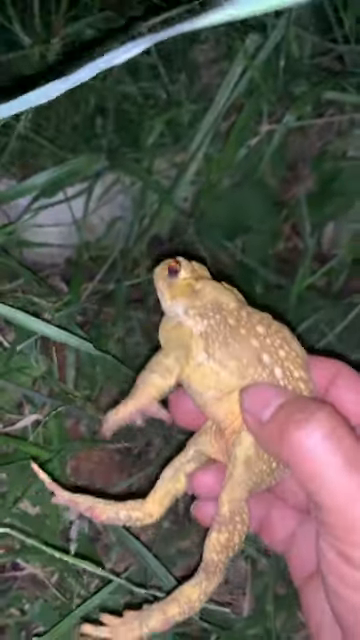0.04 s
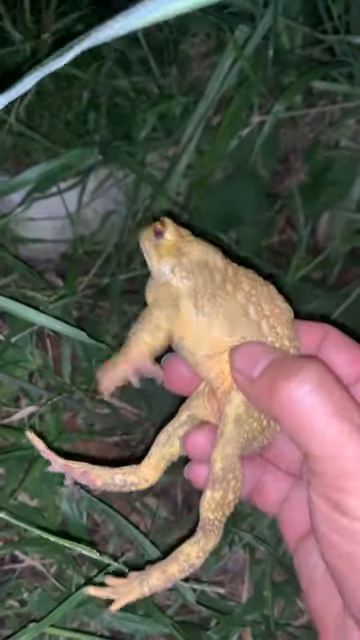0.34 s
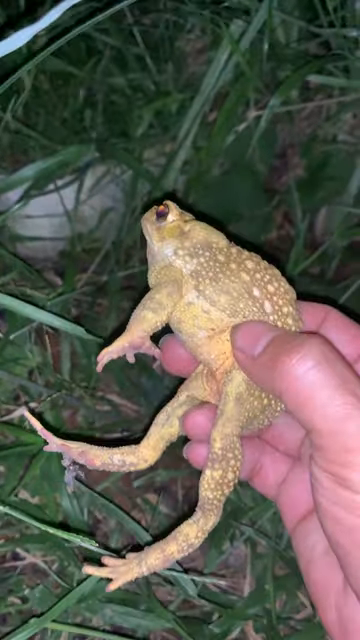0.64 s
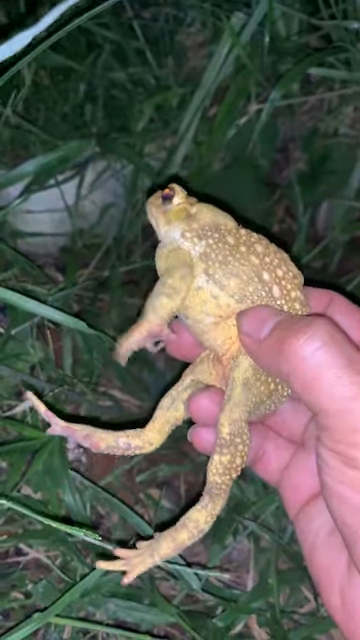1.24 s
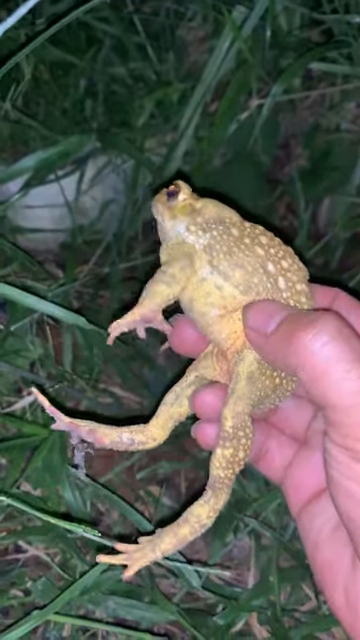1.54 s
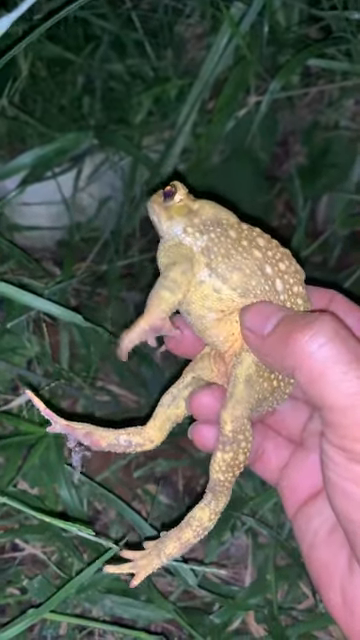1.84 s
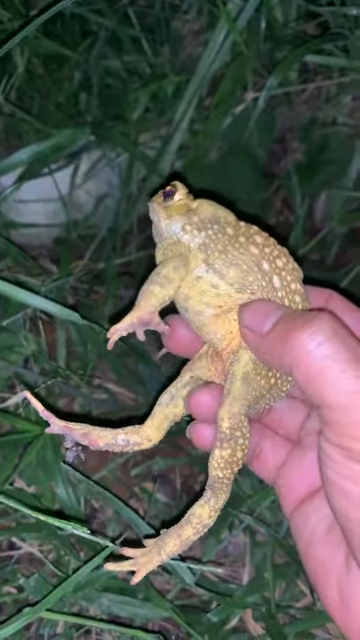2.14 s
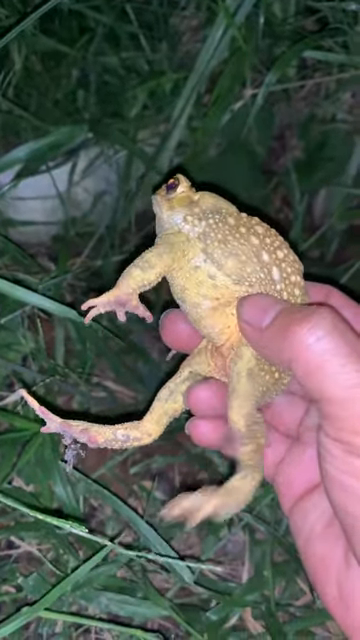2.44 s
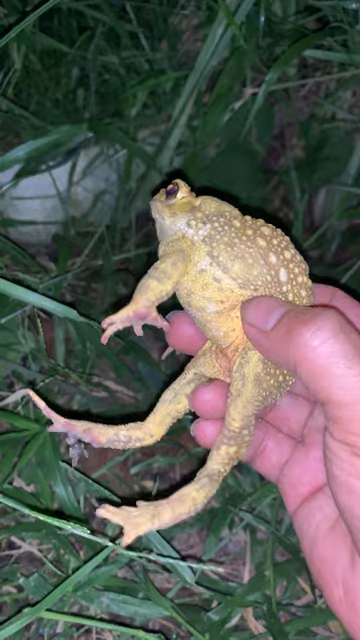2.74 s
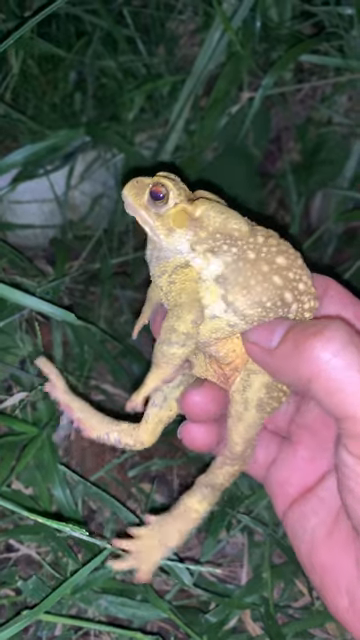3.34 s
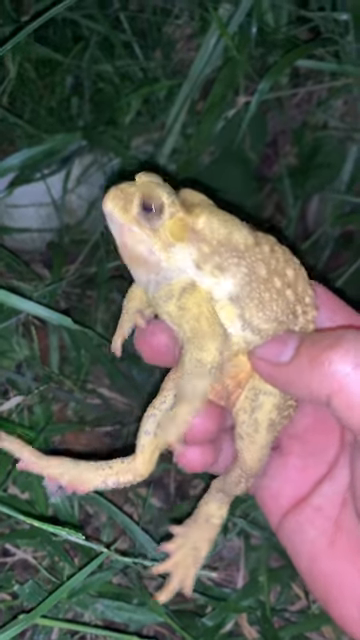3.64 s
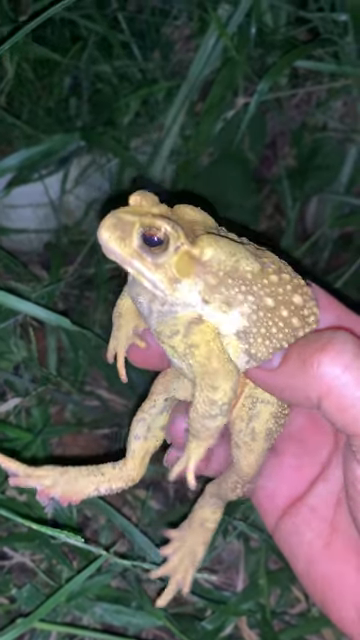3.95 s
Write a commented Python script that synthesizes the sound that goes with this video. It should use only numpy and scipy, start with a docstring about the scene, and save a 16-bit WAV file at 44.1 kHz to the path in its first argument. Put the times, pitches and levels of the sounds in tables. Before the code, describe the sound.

A toad gives short, squeaky, falling chirps close by. Three raspy ones come in the first half second, then about seven from 0.9 to 2 seconds, the strongest near 1.6. After a pause it squeaks at 3.3 seconds, then louder at 3.6 and 3.8, starting another call at the end. Softer crickets trill and chirp throughout over a faint distant rumble, one trill briefly pausing around 0.7 seconds.

```python
"""A hand-held toad gives release calls close to a stereo microphone, on a lawn at night.
Its vibrating vocal cords make short falling squeaks, often led by four quick pulses of the larynx.
Crickets sing by stridulation, sweeping a scraper over a file: a tree cricket trills and two others chirp.
Ground and plants scatter the sound, and more insects sing far off over a low rumble and faint hums."""
import sys
import numpy as np
from scipy import signal
from scipy.fft import rfft, irfft
from scipy.io import wavfile
from scipy.ndimage import uniform_filter1d

SR = 44100
rng = np.random.default_rng(int(sys.argv[2]) if len(sys.argv) > 2 else 0)


def wav_record(signal):
    """Record a signal, one row per channel, as 16-bit PCM in the file named by sys.argv[1]."""
    frames = np.transpose(np.atleast_2d(signal))
    bounded = np.clip(frames, -1, 1)
    # unit amplitude maps onto the largest positive 16-bit level
    quanta = np.round(bounded * 32767).astype(np.int16)
    wavfile.write(sys.argv[1], SR, quanta)


N = 176400

# Lone squeaks: (start [s], fade time [s], level [dB], pitch [Hz], rise [s], overtone gain [dB], sag [ratio])
SQUEAKS = [(0.9465, 0.015, -21.5, 1017, 0.0018, 0, .11), (1.638, .021, -10.5, 990, 0.026, 1, 0.052),
           (3.2525, .012, -17, 1084, 0.0017, 0, 0.2), (3.645, 0.013, -9.5, 1074, 0.0019, -0.5, 0.14),
           (3.8485, 0.023, -8, 1056, 0.0013, -2, 0.15)]
# Pulsed calls: (first peak [s], pulse spacing [s], level [dB], squeak fade time [s])
PULSED_CALLS = [(0.113, 0.0064, -15.5, 0.018), (0.237, 0.007, -14, 0.015), (0.3652, 0.0073, -14.5, 0.015),
                (1.06, 0.0066, -15, 0.019), (1.1801, 0.0058, -15.5, 0.016), (1.3562, 0.0061, -15.5, 0.018),
                (1.7744, .0062, -14, 0.02), (1.914, 0.0073, -14, 0.015), (3.9982, 0.015, -10.5, 0.013)]
# The four pulses of a call: (relative level [dB])
PULSE_LEVELS = [-2, 2.5, 2.5, 1.5]
# Spectrum of the rasp: (frequency [Hz], relative level [dB])
RASP_SPECTRUM = [(300, -21), (600, 5.5), (1500, 6.5), (3000, -9), (4000, -11), (5000, -17), (8000, -13),
                 (12000, -9.5), (15000, -35.5)]
# The toad in the left channel against the right: (frequency [Hz], level difference [dB])
TOAD_LEFT_GAIN = [(500, 0), (1000, -2.9), (1400, -4), (2000, -7), (3500, -2), (10000, 0)]
# The toad's phase lead in the left channel: (frequency [Hz], phase [rad])
TOAD_LEFT_PHASE = [(500, -2.4), (1000, -2.1), (1400, -2.6), (2000, -5.1), (4000, -6.2), (8000, -5),
                   (12000, -6.1)]
def toad():
    """Source and filter: pulses, squeaks and rasp pass through the throat; the grass reflects little."""
    notes = [(start, squeak(*row)) for start, *row in SQUEAKS]
    for start, gap, db, fade_s in PULSED_CALLS:
        for k, pulse_db in enumerate(PULSE_LEVELS):
            peak = start + k * gap
            tone, rasp = pulse(db + pulse_db)
            notes.append((peak - len(tone) / 2 / SR, (tone, rasp)))
        ending = squeak(fade_s, db - 2.5, hz=986, rise_s=.00067, overtones_db=-4, sag=.08)
        notes.append((peak + .00286, ending))
    tones, rasp_envelope = np.zeros((2, N))
    for start, (tone, rasp) in notes:
        add(tones, start, tone)
        add(rasp_envelope, start, rasp)
    voice = throat_and_body(tones + rasp_envelope * noise(RASP_SPECTRUM))
    direct = stereo(voice, on_bins(TOAD_LEFT_GAIN), on_bins(TOAD_LEFT_PHASE))
    return direct + scatter(voice, wet_db=-28, t60=.11)


def squeak(fade_s, db, hz, rise_s, overtones_db, sag):
    """A decaying oscillation of falling pitch; returns the tone and the envelope of its rasp."""
    t = np.arange(0, 2.6 * fade_s, 1 / SR)
    envelope = amp(db - 18 * (t / fade_s) ** 2.8) * np.minimum(t / rise_s, 1)
    pitch = hz * (1 - sag * np.minimum(t / fade_s, .85) ** 1.41)
    rasp = amp(-27 + .5 * db - 14 * t / fade_s) * np.minimum(t / .00033, 1)
    return envelope * larynx(pitch, overtones_db), rasp


def pulse(db, peak_hz=1146.5, rise_s=.0015, fall_s=.0012):
    """A transient: one puff through the larynx, snapping at its peak; returns tone and rasp envelope."""
    t = np.arange(-SR // 200, SR // 200) / SR
    envelope = amp(db) * np.exp(np.minimum(t / rise_s, -t / fall_s))
    pitch = peak_hz * np.exp(-125 * t) * (1 + .019 * rng.standard_normal())
    snap = amp(db - 7) * np.exp(-abs(t) / .00013) * np.tanh(t / .00006)
    return envelope * larynx(pitch, overtones_db=-13) + snap, envelope * amp(-13)


# Partials of the vocal cords: (harmonic number, relative level [dB])
HARMONICS = [(1, 0), (2, -10.5), (3, -29), (4, -29.5)]
def larynx(hz, overtones_db):
    """Periodic vibration of the cords gives a harmonic series with a strong fundamental."""
    phase = 2 * np.pi * np.cumsum(hz) / SR
    return sum(amp(db + overtones_db * (k > 1)) * np.sin(k * phase) for k, db in HARMONICS)


# Response of throat and mouth: (frequency [Hz], gain [dB])
THROAT_RESPONSE = [(300, 0), (600, 5.5), (760, -1.5), (1000, -1), (1350, 3), (1650, 2), (2100, 1.5),
                   (2600, -1), (5500, -6), (11500, -2), (15000, 6)]
def throat_and_body(source, ring_hz=1010, t60=.06, ring_db=-15):
    """Resonance: throat and mouth colour the voice, and the body rings as one damped mode."""
    voice = stereo(source, on_bins(THROAT_RESPONSE), lead=0)[0]  # the left channel serves as a filter
    radius = np.exp(-np.log(1000) / (t60 * SR))
    pole = radius * np.exp(2j * np.pi * ring_hz / SR)
    return voice + amp(ring_db) * 2 * signal.lfilter([1 - radius], [1, -pole], voice).real


# Pace of the tree cricket's wings: (time [s], stroke rate [Hz])
TRILL_RATE = [(0, 29), (1.1, 29), (1.6, 29), (3.2, 28.5), (4, 29)]
# Envelope of the trill, with one pause: (time [s], level [dB])
TRILL_LEVEL = [(0, -41.5), (.635, -43.5), (.66, -60), (1.05, -58), (1.062, -50), (1.13, -45), (1.18, -41),
               (2.4, -41), (4, -41)]
# Diffuse sound around the trill: (frequency [Hz], relative level [dB])
HALO_SPECTRUM = [(2600, -34.5), (3000, -12.5), (3250, 5), (3500, 3), (3800, -3.5), (4200, -38.5),
                 (5000, -57)]
def tree_cricket():
    """Interference: the falling, fluttering strokes of a trill beat against their own echoes."""
    cycles = np.cumsum(on_samples(TRILL_RATE)) / SR
    level = amp(on_samples(TRILL_LEVEL))
    flutter = 1 + .48 * np.cos(6 * np.pi * cycles + 1.65 * drift(20))  # three swells a stroke
    trill = level * unit(flutter * wings(cycles))
    delayed = np.zeros(N)
    add(delayed, .009, trill)
    halo = level * amp(-14) * np.array([noise(HALO_SPECTRUM), noise(HALO_SPECTRUM)])
    direct = amp(-6) * stereo(trill, left_db=1.5, lead=2.6)
    echo = amp(-9) * stereo(delayed, left_db=1.5, lead=-.8)
    return direct + echo + scatter(trill, wet_db=-9, t60=.12) + halo


def wings(cycles, hz=3368, fall_hz=200, duty=.9, waver_hz=29.8):
    """Continuous stridulation: each wing stroke swells and fades as its pitch falls."""
    progress = np.minimum(cycles % 1 / duty, 1)
    pitch = hz + fall_hz * (.5 - progress) + waver_hz * drift(260)
    return np.sqrt(np.sin(np.pi * progress) + 1e-9) * np.sin(2 * np.pi * np.cumsum(pitch) / SR)


# Chirps of the near cricket: (middle of first stroke [s])
CHIRP_TIMES = [-.06, .125, .309, .502, .69, .872, 1.049, 1.238, 1.42, 1.605, 1.787, 1.971, 2.155, 2.343,
               2.531, 2.714, 2.895, 3.081, 3.274, 3.463, 3.645, 3.83]
# The four strokes of a chirp: (level [dB])
STROKE_LEVELS = [-41, -38.5, -39, -39]
def near_cricket(spacing_s=.0236, stroke_s=.021):
    """Pulsed stridulation: four wing strokes in quick succession make each chirp."""
    chirps = np.zeros(N)
    for time in CHIRP_TIMES:
        for k, db in enumerate(STROKE_LEVELS):
            add(chirps, time + k * spacing_s - stroke_s / 2, stroke(stroke_s, db))
    return stereo(chirps, left_db=2, lead=-.59) + scatter(chirps, wet_db=-10, t60=.13)


def stroke(length_s, db, hz=6215, fall_hz=93, waver_rad=.66, octave_db=-23):
    """Forced vibration: one slightly uneven sweep of scraper over file gives a tone and its octave."""
    progress = np.arange(0, 1, 1 / (length_s * SR))
    jitter = rng.standard_normal(N // 100)
    waver = waver_rad * unit(uniform_filter1d(uniform_filter1d(jitter, 120), 120))
    pitch = hz * (1 + .0053 * rng.standard_normal()) + fall_hz * (.5 - progress)
    phase = 2 * np.pi * (np.cumsum(pitch) / SR + rng.random()) + np.resize(waver, len(progress))
    envelope = amp(db + rng.standard_normal()) * np.sin(np.pi * progress)
    return envelope * (np.sin(phase) + amp(octave_db) * np.sin(2 * phase))


# Buzzes of the small ground cricket: (time [s])
BUZZ_TIMES = [0.093, 0.225, 0.384, 0.542, 0.678, .845, 1, 1.177, 1.329, 1.46, 1.612, 1.772, 1.94, 2.093,
              2.254, 2.394, 2.555, 2.706, 2.867, 3.025, 3.188, 3.35, 3.499, 3.668, 3.82, 3.981]
def ground_cricket(hz=7587, stroke_hz=106, buzz_s=.065, db=-46):
    """Modulation: very fast strokes vary the amplitude and phase of one thin tone, so it buzzes."""
    buzzes, t = np.zeros(N), np.arange(0, buzz_s, 1 / SR)
    gate = np.clip(np.minimum(t / .001, (buzz_s - t) / .0082), 0, 1)
    throb = np.sin(2 * np.pi * stroke_hz * t)
    for time in BUZZ_TIMES:
        phase = 2 * np.pi * (hz + 12 * rng.standard_normal()) * t + .74 * throb
        envelope = amp(db + rng.standard_normal()) * gate * (1 + .61 * throb)
        add(buzzes, time - .002, envelope * np.sin(phase))
    return stereo(buzzes, left_db=.2, lead=.51) + scatter(buzzes, wet_db=-16, t60=.04)


# Far crickets: (pitch [Hz], spread [Hz], chirp rate [Hz], duty [ratio], stroke rate [Hz], level [dB])
FAR_CRICKETS = [(6100, 360, 4.8, 0.69, 46, -56), (7200, 270, 6.5, 0.38, 92, -56),
                (6400, 630, 5.9, 1, 210, -61)]
# High insect sizzle: (frequency [Hz], relative level [dB])
SIZZLE_SPECTRUM = [(8500, -96), (9900, -91), (10400, -4), (11200, 8.5), (12500, -1.5), (13500, -7.5),
                   (15000, -48)]
def far_insects(sizzle_db=-62.5, throb_hz=36):
    """Reverberation blurs distant crickets, each chirping at its own pace, under a high sizzle."""
    t, chorus = np.arange(N) / SR, np.zeros(N)
    for hz, spread_hz, chirp_hz, duty, stroke_hz, db in FAR_CRICKETS:
        cycle = (chirp_hz * t + .5 + .11 * drift(6)) % 1
        gate = uniform_filter1d((cycle < duty) * 1., 400)
        strokes = 1 + .51 * np.sin(2 * np.pi * (stroke_hz * t + .31 * drift(9)))
        chorus += amp(db) * unit(gate * strokes * narrow_band(hz, spread_hz))
    sizzle = amp(sizzle_db) * noise(SIZZLE_SPECTRUM)
    sizzle *= 1 + .13 * np.sin(2 * np.pi * (throb_hz * t + .26 * drift(2.3)))
    crickets = stereo(chorus, left_db=-1, lead=-1.48) + scatter(chorus, wet_db=1, t60=.22)
    return crickets + stereo(sizzle, left_db=0, lead=-1.63)


# Distant rumble: (frequency [Hz], relative level [dB])
RUMBLE_SPECTRUM = [(20, -24), (35, -32), (52, 2.5), (80, -0.5), (160, 0), (210, -3.5), (270, -16),
                   (420, -22.5), (580, -17), (750, -48), (1500, -65.5)]
# Hush of the far chorus: (frequency [Hz], relative level [dB])
HUSH_SPECTRUM = [(300, 2), (800, 3), (1100, -2.5), (1500, 2), (1850, -1), (2150, 13), (2600, -24),
                 (3500, 17), (4100, -1.5), (4700, 4.5), (5300, -11.5), (6300, 0), (7700, 10), (8500, -3),
                 (13000, -100), (15000, -25.5)]
# Likeness of the two channels: (frequency [Hz], coherence [ratio])
COHERENCE = [(40, 0.99), (120, 0.87), (250, 0.75), (600, 0), (3000, 0), (7000, .6), (11000, 0)]
def night_air(rumble_db=-48, hush_db=-59):
    """Partial coherence: rumble and hush reach both channels, most alike at the lowest frequencies."""
    left, independent = [amp(rumble_db) * noise(RUMBLE_SPECTRUM) + amp(hush_db) * noise(HUSH_SPECTRUM)
                         for _ in range(2)]
    shared = on_bins(COHERENCE)
    right = irfft(shared * rfft(left) + np.sqrt(1 - shared ** 2) * rfft(independent), N)
    return np.array([left, right])


# Faint far hums: (frequency [Hz], spread [Hz], level [dB])
HUMS = [(603, 30.6, -76.5), (1113, 30, -79)]
def far_hums():
    """Noise confined to a narrow band is heard as a wavering hum."""
    return sum(amp(db) * unit(narrow_band(hz, spread_hz)) for hz, spread_hz, db in HUMS)


def scatter(x, wet_db, t60):
    """Scattering: ground and plants return sparse, decaying echoes, different in each channel."""
    t = np.arange(SR // 2) / SR
    taps = rng.standard_normal((2, len(t))) * (rng.random((2, len(t))) < .05)
    responses = taps * (t > .002) * amp(-60 * t / t60)
    return amp(wet_db) * x.std() * np.array([unit(signal.fftconvolve(x, h)[:N]) for h in responses])


def stereo(x, left_db, lead):
    """Directional hearing: the left channel differs from the right in level [dB] and phase lead [rad]."""
    response = amp(left_db) * np.exp(1j * lead) * np.ones(N // 2 + 1)
    kernel = np.roll(irfft(response, N), 256)[:513] * np.hanning(513)
    return np.array([signal.oaconvolve(x, kernel, "same"), x])


def narrow_band(hz, spread_hz):
    """Random modulation spreads a tone into a narrow band."""
    t = np.arange(N) / SR
    return ((drift(spread_hz) + 1j * drift(spread_hz)) * np.exp(2j * np.pi * hz * t)).real


def noise(spectrum):
    """White noise filtered to a spectrum, at rms 1."""
    return unit(irfft(rfft(rng.standard_normal(N)) * amp(on_bins(spectrum)), N))


def drift(hz):
    """Low-pass noise: a random fluctuation of rms 1."""
    low_pass = np.exp(-(np.fft.rfftfreq(N, 1 / SR) / hz) ** 2)
    return unit(irfft(rfft(rng.standard_normal(N)) * low_pass, N))


def on_bins(points):
    """Interpolation of a table over log frequency."""
    hz, values = np.transpose(points)
    return np.interp(np.log(np.fft.rfftfreq(N, 1 / SR) + 1), np.log(hz), values)


def on_samples(points):
    """Interpolation of a table over time."""
    return np.interp(np.arange(N) / SR, *np.transpose(points))


def amp(db):
    """Decibels to amplitude ratio."""
    return 10 ** (np.asarray(db) / 20)


def unit(x):
    """Normalisation to rms 1."""
    return x / np.sqrt(np.mean(x ** 2) + 1e-20)


def add(mix, start_s, sound):
    """Superposes a sound on the mix at a given time."""
    i = round(start_s * SR)
    sound = sound[max(-i, 0):]
    part = mix[max(i, 0):][:len(sound)]
    part += sound[:len(part)]


def scene():
    """Superposition: the toad in front of the insects and the night air."""
    foreground = toad() + tree_cricket() + near_cricket() + ground_cricket()
    return foreground + far_insects() + night_air() + far_hums()


def record(dry):
    """Band limiting: a low-pass filter removes the highest treble."""
    low_pass = signal.firwin(127, cutoff=14400, window=("kaiser", 8), fs=SR)
    return signal.oaconvolve(dry, low_pass[None], "same")


dry = scene()
out = record(dry)
wav_record(out)
```